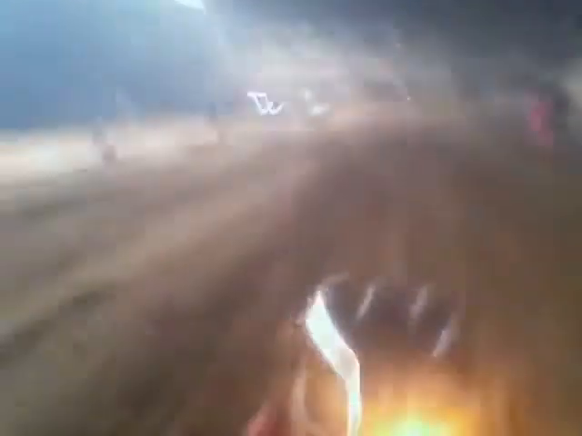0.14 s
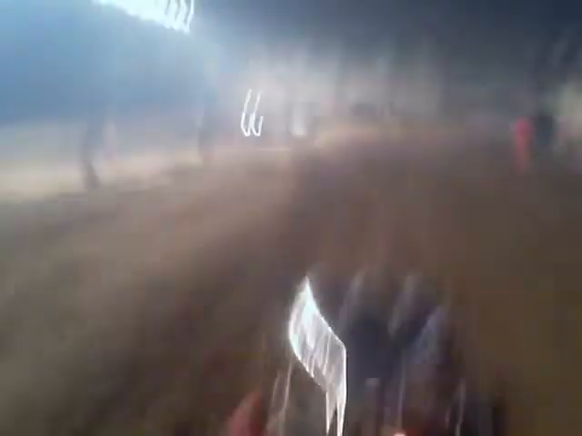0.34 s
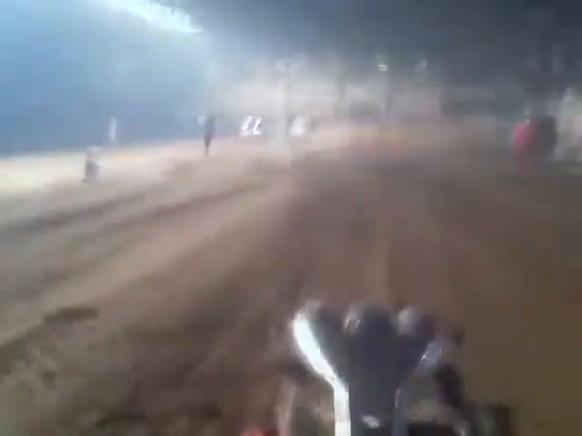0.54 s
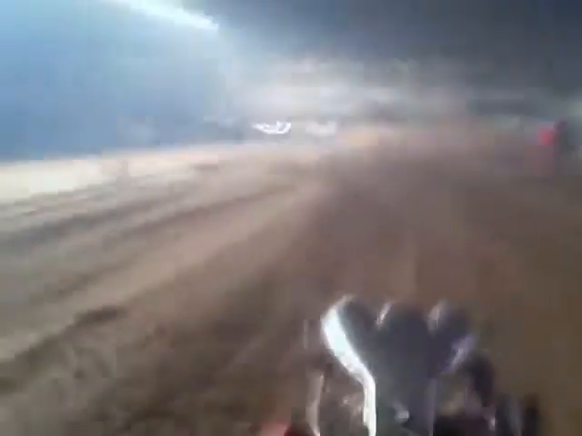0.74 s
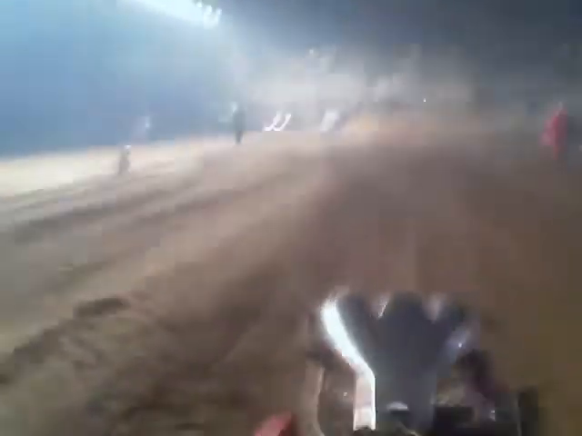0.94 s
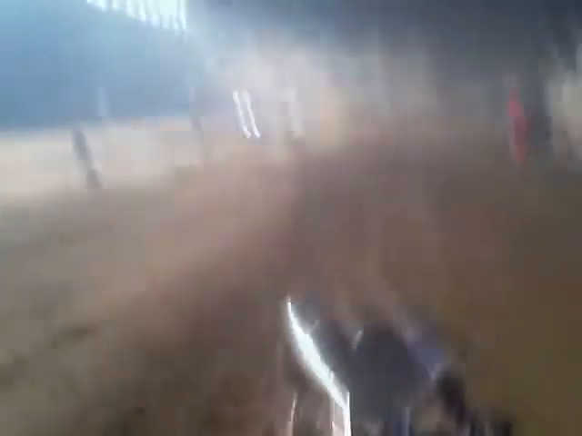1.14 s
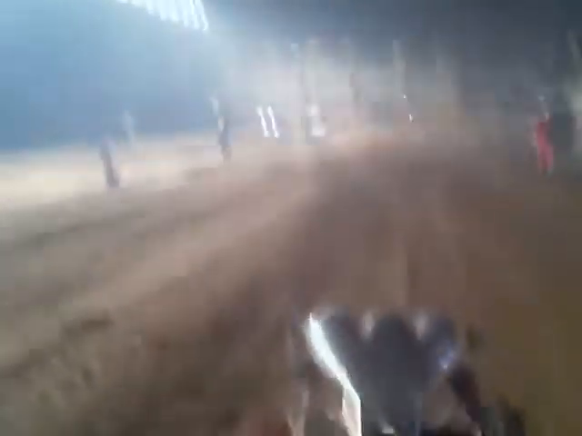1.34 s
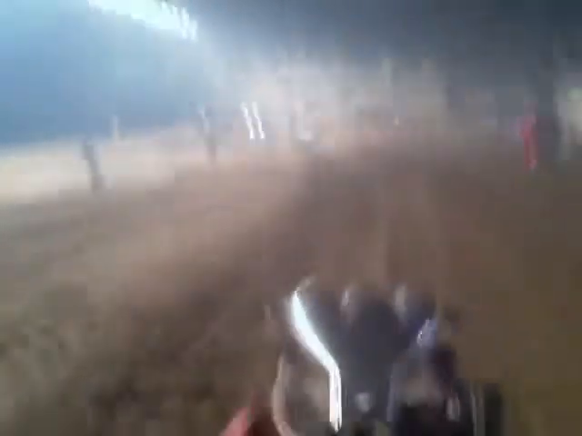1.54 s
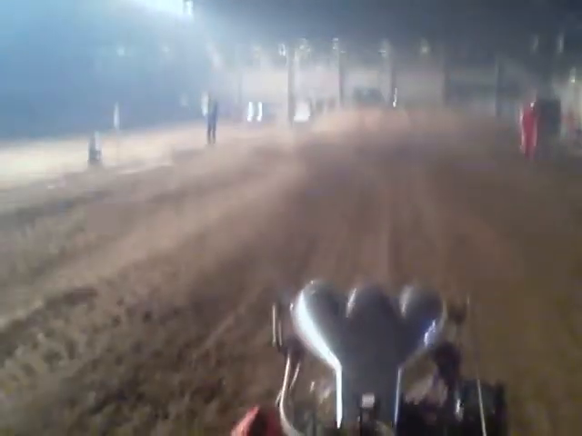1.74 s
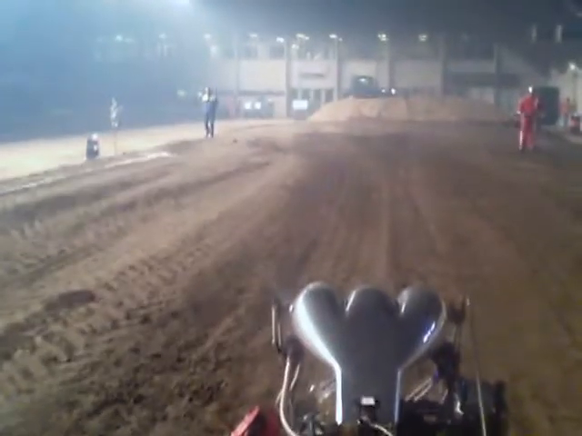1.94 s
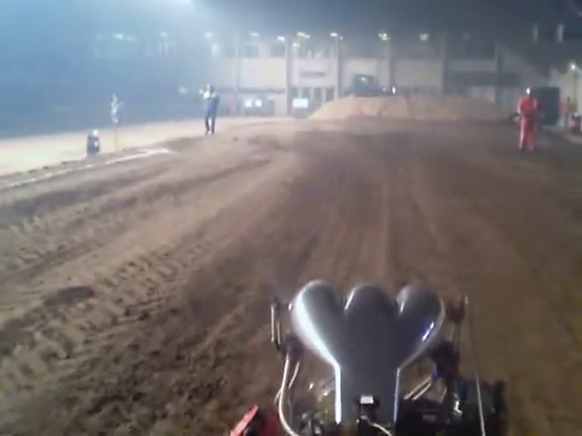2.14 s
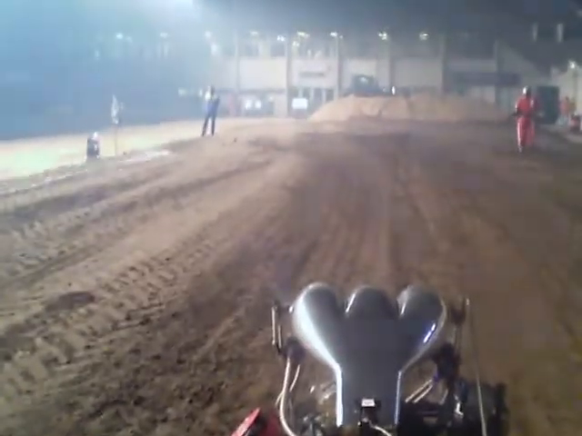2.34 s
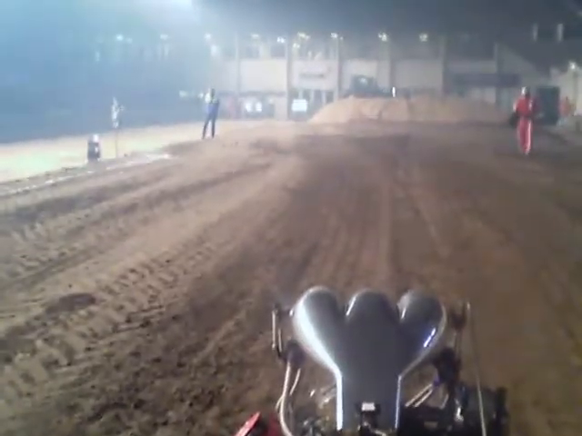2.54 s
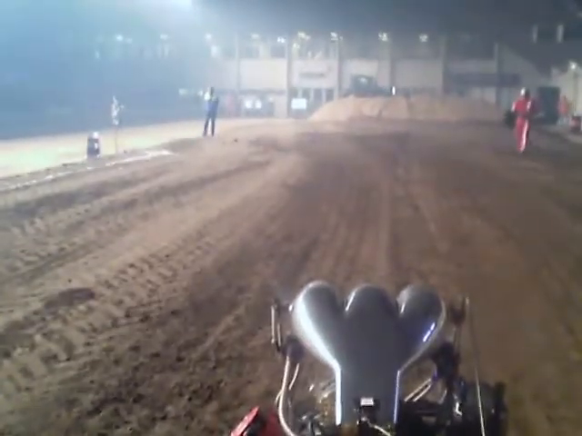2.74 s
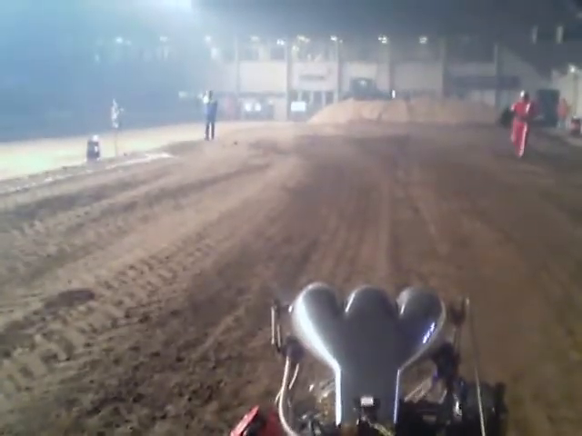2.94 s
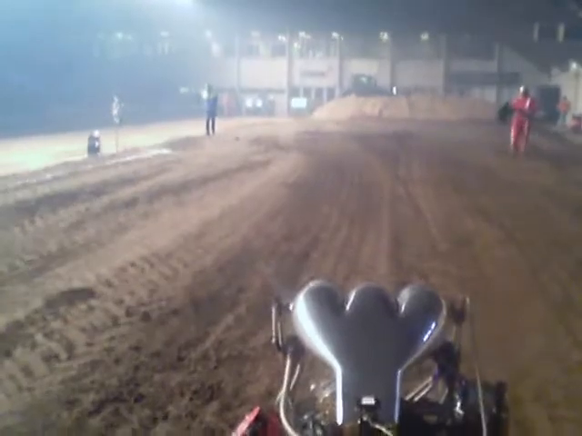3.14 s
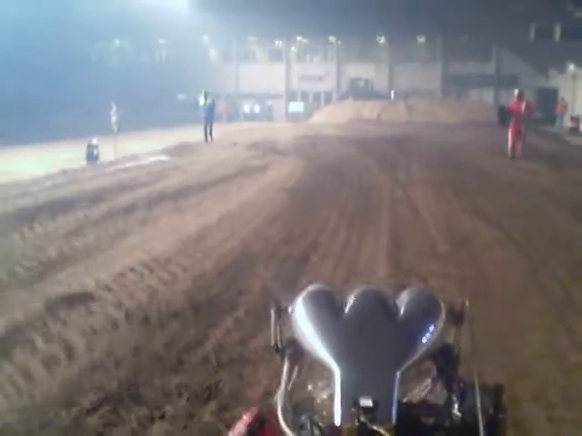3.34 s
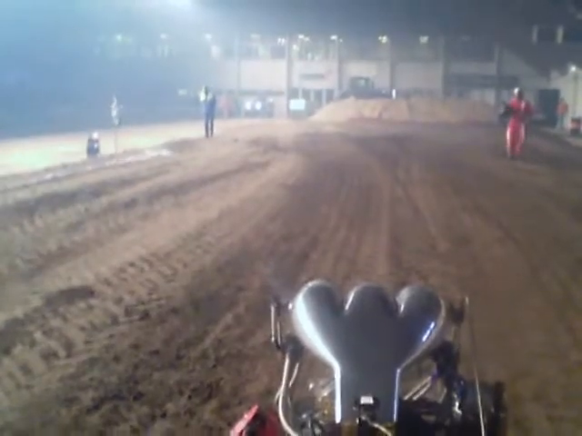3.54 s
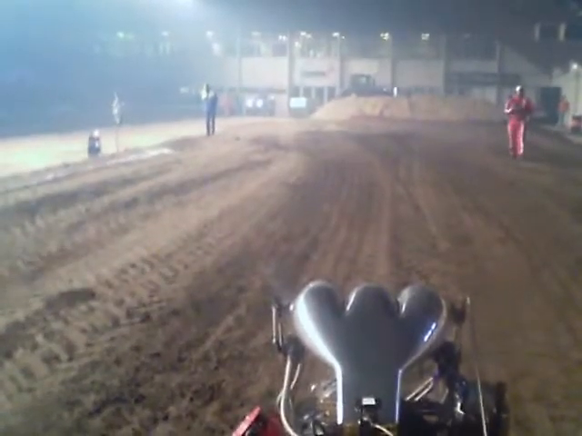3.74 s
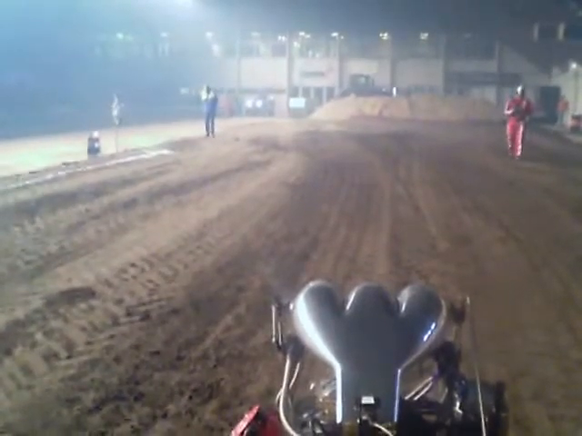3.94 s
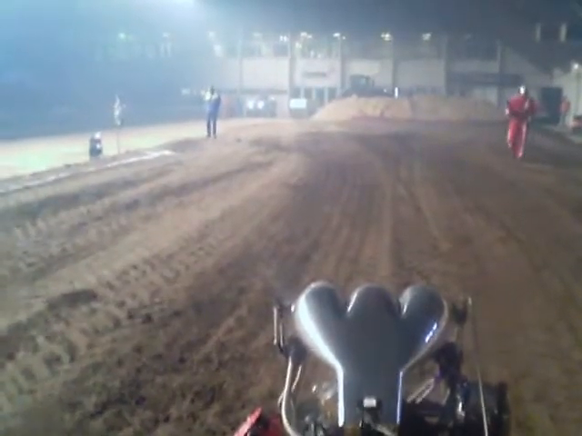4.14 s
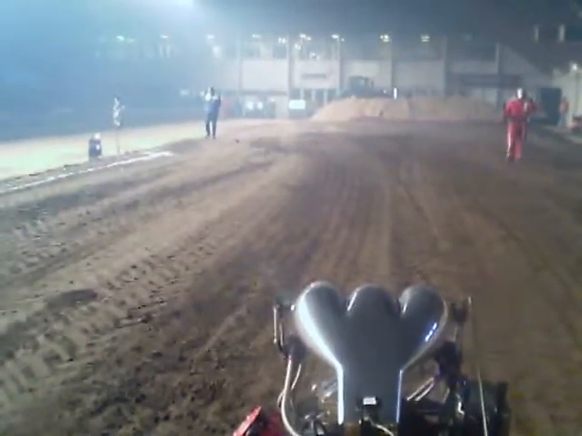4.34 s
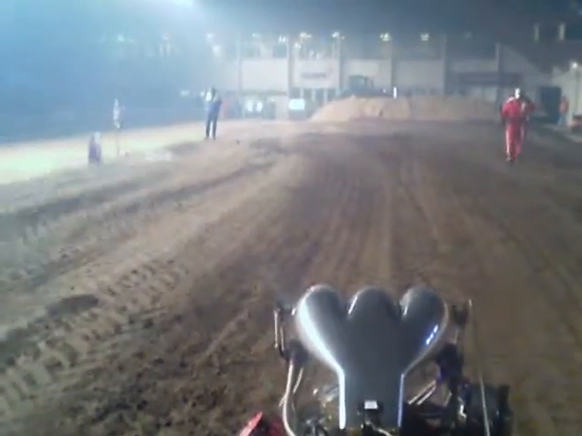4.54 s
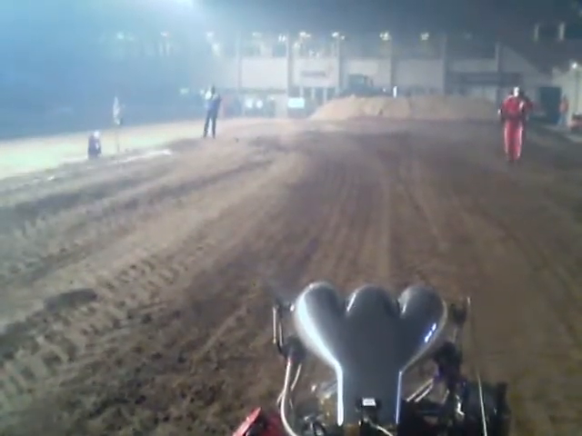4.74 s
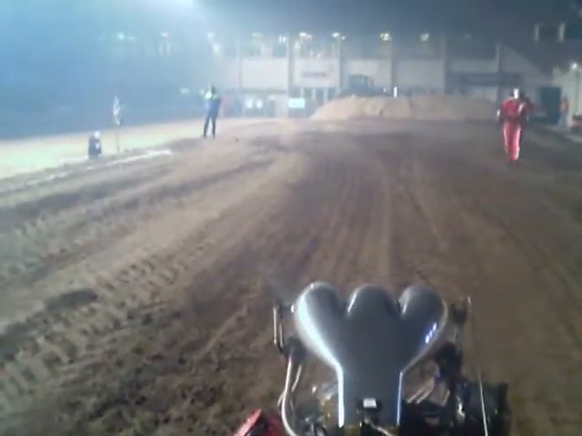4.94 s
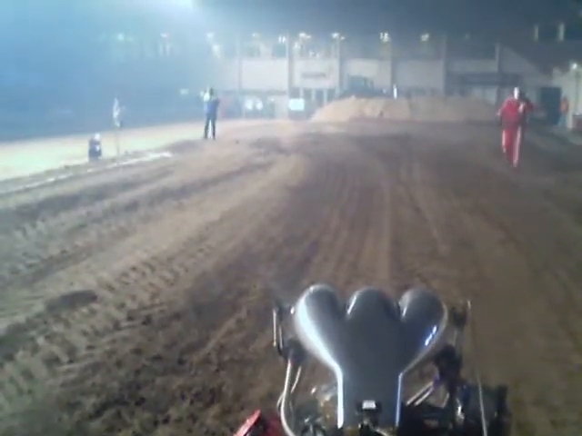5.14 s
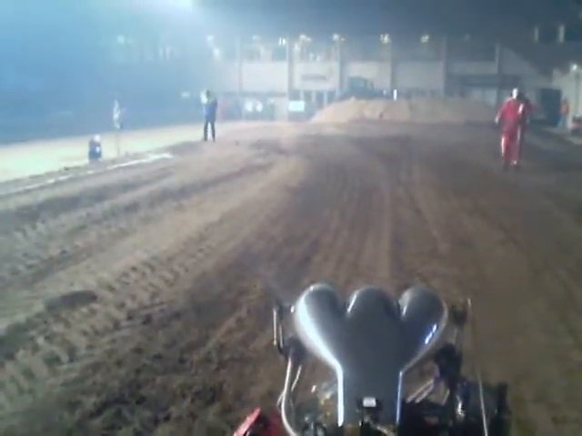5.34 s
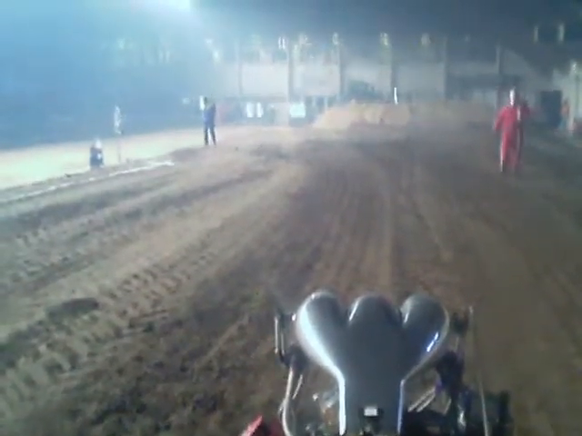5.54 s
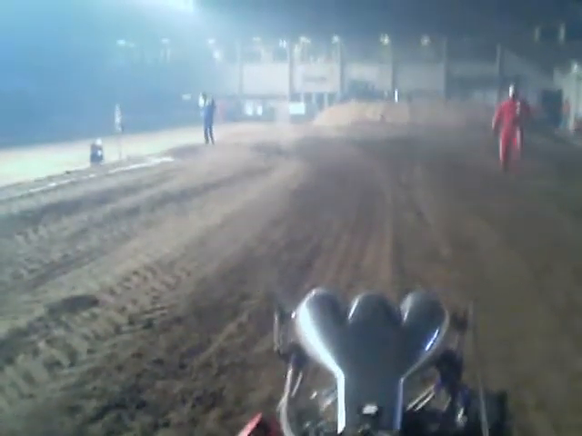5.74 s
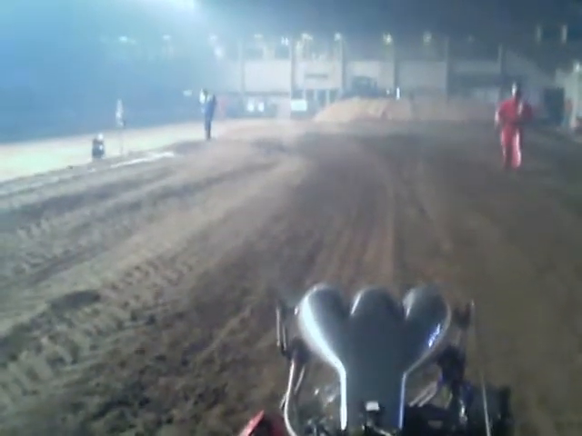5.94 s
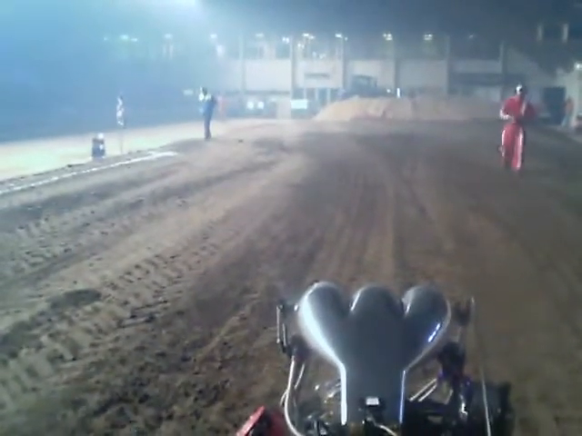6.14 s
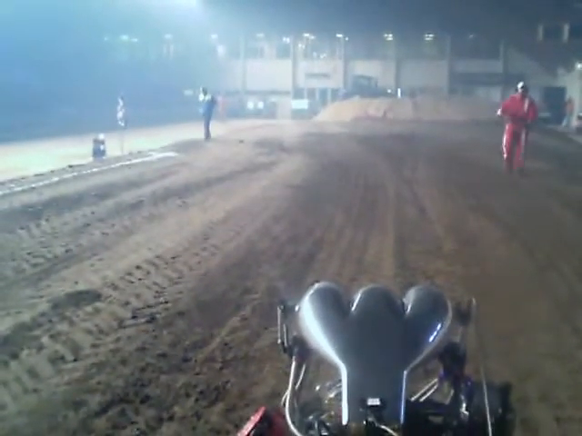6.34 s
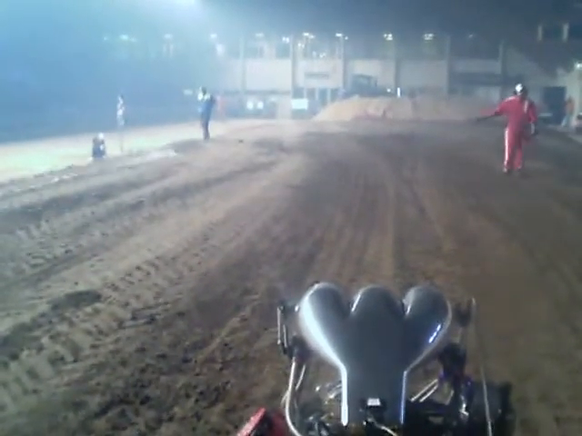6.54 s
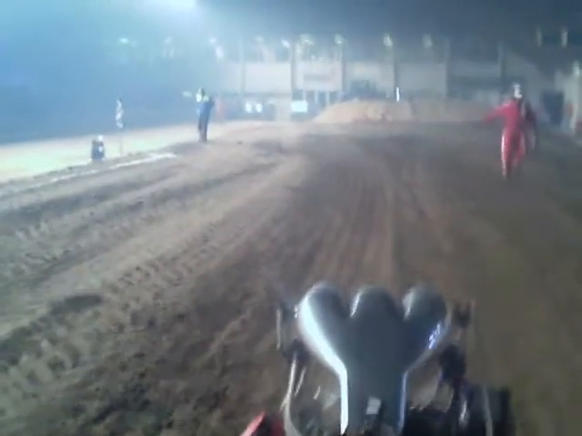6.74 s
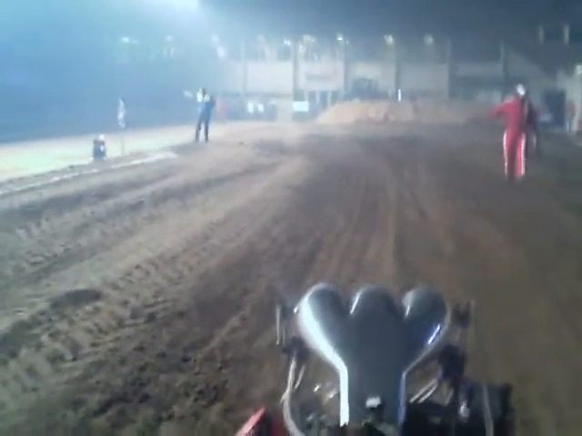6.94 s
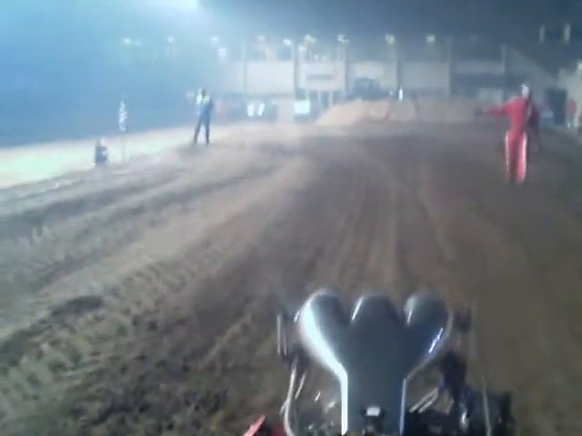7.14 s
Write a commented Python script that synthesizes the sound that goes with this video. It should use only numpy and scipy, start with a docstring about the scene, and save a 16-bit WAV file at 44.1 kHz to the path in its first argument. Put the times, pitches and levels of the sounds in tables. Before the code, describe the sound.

A supercharged pulling tractor roars at full throttle in an indoor arena, with hissing exhaust and whining gears overloading a small microphone mounted on the vehicle. In under a second the throttle snaps shut and the roar dies away in the hall. The chassis gives a few light knocks and rattles as it stops. The engine speed falls, wavers, then settles into a much quieter idle with irregular sharp exhaust cracks.

```python
"""A supercharged pulling tractor runs at full throttle; the throttle snaps shut, and the engine hunts
and settles to an idle. Each firing releases a crack of exhaust gas, which the hall smears into a roar.
Gears whine under load, and the frame rumbles and jolts as the tractor rocks to a stop. All is heard
through a small camera bolted to the frame: its housing rings near 1.1 kHz, and full throttle
overloads its microphone amplifier."""
import sys
import numpy as np
from scipy import signal
from scipy.io import wavfile
from scipy.ndimage import uniform_filter1d

SR = 44100
rng = np.random.default_rng(int(sys.argv[2]) if len(sys.argv) > 2 else 0)


def transcribe(signal):
    """Save signal, clipped to [-1, 1], as a 16-bit WAV file at the path in sys.argv[1]."""
    frames = np.atleast_2d(signal).T
    limited = np.clip(frames, -1, 1)
    pcm = np.round(limited * 32767).astype(np.int16)
    wavfile.write(sys.argv[1], SR, pcm)


N = 321048

# Engine speed: full throttle, the fall, hunting, idle. Each row: time in seconds, firings per second.
FIRING_RATE = [(0.0, 407.4), (0.7, 407.42), (1.03, 187.53), (1.19, 127.84), (1.57, 132.56), (1.78, 77.85),
               (2.0, 73.87), (2.3, 129.18), (2.79, 81.94), (3.25, 111.41), (3.6, 93.15), (3.8, 90.12),
               (4.07, 102.23), (4.99, 98.73), (5.36, 103.19), (5.7, 99.94), (6.34, 102.85), (6.93, 99.76),
               (7.28, 106.04)]
# Loudness under changing load; the crackle swells as the engine gains speed. Each row: time in seconds,
# then nominal levels in dB of exhaust crackle, mount shaking and frame rumble.
ENGINE_LEVELS = [(0, 3.5, -15.5, -18.5), (.35, 4.5, -17.5, -14.5), (.64, 2.5, -11, -16),
                 (.709, -13.5, -17.5, -23), (.72, -37, -36.5, -48), (.81, -36, -39, -41.5),
                 (.87, -38, -45, -50), (.92, -42.5, -49, -56), (1.03, -45, -47, -61),
                 (1.3, -41, -48, -53.5), (1.56, -41.5, -45.5, -58), (1.62, -44, -51.5, -57),
                 (1.77, -56, -63.5, -63), (1.98, -49.5, -62.5, -66), (2.04, -46.5, -55, -64),
                 (2.2, -42.5, -50, -66.5), (2.53, -60.5, -58.5, -71), (3.08, -44.5, -55.5, -68),
                 (3.55, -56, -58, -68.5), (4., -48, -57, -67.5), (4.58, -50, -58, -67),
                 (4.63, -55, -56, -69), (4.67, -49, -59, -67), (5.2, -49.5, -58, -67.5),
                 (6.73, -50, -58.5, -68.5), (6.79, -45.5, -55.5, -74), (6.85, -51.5, -56.5, -68.5),
                 (7.28, -47.5, -57, -65)]
# Imbalance of the cylinders, in firing order. Each entry: relative strength in dB.
CYLINDER_STRENGTHS = [-3.5, -2, 2.5, -0.1, -1, 0.2, 1.2, -2.5]
# The loudest single exhaust cracks. Each row: start in seconds, nominal peak in dB.
LOUD_CRACKS = [(1.1208, -24), (1.1977, -25), (1.3244, -26), (1.3845, -27.5), (1.907, -32.5), (2.0264, -30),
               (2.175, -28), (2.4598, -33), (2.6016, -35.5), (2.6414, -35), (3.0333, -29), (3.1238, -26),
               (3.271, -34), (3.5105, -33), (3.7792, -28), (3.9195, -27), (4.0013, -30), (4.0417, -28.5),
               (4.2597, -28.5), (4.2888, -25), (4.3264, -31), (4.3971, -25.5), (4.4267, -26.5),
               (4.5244, -28), (4.555, -27), (4.734, -31.5), (4.7644, -29.5), (4.796, -24), (5.006, -30.5),
               (5.0484, -28.5), (5.199, -27.5), (5.2868, -35), (5.3155, -29.5), (5.432, -30.5),
               (5.6002, -33.5), (5.67, -27.5), (5.828, -32), (6.0333, -26.5), (6.0766, -29.5),
               (6.126, -29.5), (6.193, -29), (6.222, -30), (6.312, -32.5), (6.4281, -28), (6.4958, -26),
               (6.6239, -31), (6.7855, -32), (6.852, -31), (6.8932, -29), (6.9316, -34), (7.0523, -27),
               (7.0896, -29.5), (7.1768, -27), (7.214, -26)]
# Exhaust hiss. Each row: frequency in Hz, relative spectral density in dB.
EXHAUST_SPECTRUM = [(400, -23.5), (800, -15.5), (1500, -17.5), (2600, -20), (4300, -19), (4800, -10),
                    (5200, -11.5), (6000, -2), (6500, -4.5), (7700, -2), (9000, -5), (10000, -17),
                    (10800, -15.5)]
# Roar thrown back by the hall. Each row: frequency in Hz, relative spectral density in dB.
HALL_SPECTRUM = [(300, -35), (700, -10.5), (1400, -3), (2600, -14.5), (4200, -10), (4900, -11),
                 (6000, -0.5), (7700, -5.5), (9000, -5.5), (10000, -11), (10800, -22)]
# Gear whine under load. Each row: time in seconds, meshing rate in Hz, level in dB before the throb.
GEAR_MESH = [(0, 1105, -11.5), (.12, 1144, -12), (.3, 1092, -12), (.47, 1168, -14), (.65, 1083, -15),
             (.712, 1072, -22)]
# Weaker housing modes. Each row: frequency in Hz, bandwidth in Hz, level in dB against the main mode.
HOUSING_MODES = [(930, 91, -16.5), (1656, 250, -15.5), (2203, 115, -14.5)]
# Tones at once and twice the firing rate. Each entry: level in dB against the rumble, before filtering.
FIRING_HARMONICS = [-3.5, -14.5]
# Frame rumble while rolling. Each row: frequency in Hz, relative spectral density in dB.
ROLLING_SPECTRUM = [(5, 0), (30, -15), (120, 5), (200, -6.5), (350, -1.5), (480, -11), (800, -31),
                    (2000, -43)]
# Frame rumble at rest. Each row: frequency in Hz, relative spectral density in dB.
RESTING_SPECTRUM = [(5, 7), (30, 1), (130, -3), (180, -7.5), (215, 7), (260, -8.5), (400, -9), (800, -34.5),
                    (2000, -41)]
# Jolts of the frame. Each row: time in seconds, push level in dB, push length in ms (negative for
# a pull), rattle level in dB.
FRAME_JOLTS = [(0.792, -40, 2, -29.5), (0.85, -39, -1.5, -44), (1.054, -42, -1.5, -44),
               (1.327, -43.5, -1, -55), (1.548, -39, 3.5, -45), (1.572, -37.5, -1.5, -38),
               (1.653, -42.5, 1.5, -52), (1.687, -41, 3, -51), (1.738, -47, -1, -58), (1.79, -55, 9, -61),
               (1.814, -48, -3, -53), (1.876, -46, -3, -57), (1.936, -46, -2, -62),
               (1.959, -48.5, 1.5, -58), (1.99, -56, -1.5, -56)]
# Loose parts after a jolt. Each row: frequency in Hz, relative spectral density in dB.
RATTLE_SPECTRUM = [(300, -15), (1500, -5), (4000, -2), (6000, -24), (11000, -32)]


def gain_of(db):
    """Amplitude ratio of a level in decibels; doubling the level gives the power ratio."""
    return 10 ** (np.asarray(db) / 20)


def unit_rms(x):
    """Normalisation to a mean power of 1."""
    return x / np.sqrt(np.mean(x ** 2) + 1e-20)


def curve(rows, column):
    """Linear interpolation of one column of a time table at every sample."""
    rows = np.array(rows)
    return np.interp(np.arange(N) / SR, rows[:, 0], rows[:, column])


def drift(samples):
    """A moving average turns white noise into a slow fluctuation of rms 1."""
    return unit_rms(uniform_filter1d(rng.standard_normal(N), size=samples))


def coloured(white, spectrum, size, patchy_db):
    """Spectral shaping: white noise takes on a spectrum that drifts in small patches, at like power."""
    window = dict(nperseg=size, noverlap=3 * size // 4)
    hz, _, bins = signal.stft(white, SR, **window)
    patches = uniform_filter1d(rng.standard_normal(bins.shape), size=5, axis=0)
    patches = unit_rms(uniform_filter1d(patches, size=4, axis=1))
    points_hz, points_db = np.transpose(spectrum)
    db = np.interp(np.log(hz + 1), np.log(points_hz + 1), points_db)
    shape = unit_rms(gain_of(db[:, None] + patchy_db * patches))
    return signal.istft(bins * shape, SR, **window)[1][:N]


def firings():
    """Phase is the integral of rate: the count of firings so far, starting partway through one."""
    return .69 + np.cumsum(curve(FIRING_RATE, column=1)) / SR


def puff(rise_ms, fade_ms):
    """Exponential rise and decay: the power of one burst over 30 ms, peak 1."""
    ms = np.arange(1320) * 1000 / SR
    shape = (1 - np.exp(-ms / rise_ms)) * np.exp(-ms / fade_ms)
    return shape / shape.max()


def gas_pulses(spread_db, cylinder_share, jitter_ms, rise_ms, fade_ms):
    """A pulse train of gas power, mean near 1: one puff a firing, uneven by cylinder and by chance."""
    phase = firings() - .38  # the blast arrives partway through each firing
    onsets = np.flatnonzero(np.diff(np.floor(phase)))
    strength, lateness = rng.standard_normal((len(onsets), 2)).T
    firing_hz = np.gradient(phase)[onsets] * SR
    unevenness = np.clip(56.0 / firing_hz, 0, 1)  # fast firings are more even
    cylinder_db = np.take(CYLINDER_STRENGTHS, phase[onsets + 1].astype(int), mode="wrap")
    db = unevenness * spread_db * np.clip(strength, -3, 1.1) + cylinder_share * cylinder_db
    delays = (lateness * jitter_ms * SR / 1000).astype(int)
    train = np.zeros(N)
    train[np.clip(onsets + delays, 0, N - 1)] = gain_of(2 * db)
    power = signal.oaconvolve(train, puff(rise_ms, fade_ms))[:N].clip(0)
    return power / uniform_filter1d(power + 1e-9, size=8000)


def exhaust():
    """Amplitude modulation: the firings gate the hiss of escaping gas into a crackle."""
    power = gas_pulses(spread_db=8.4, cylinder_share=0.9, jitter_ms=0.48, rise_ms=1.0, fade_ms=2.3)
    power *= gain_of(2 * curve(ENGINE_LEVELS, column=1))
    power *= gain_of(2 * 1.44 * drift(4000))  # the idle lopes
    crest_db = 8.5  # a crack's rms lies this far under its peak
    for start_s, peak_db in LOUD_CRACKS:
        start = round(start_s * SR)
        crack = gain_of(2 * (peak_db - crest_db)) * puff(rise_ms=0.85, fade_ms=1.85)
        power[start - 220:start + 220] *= .12  # the crack takes the place of its firing
        span = power[start:start + len(crack)]
        span += crack[:len(span)]
    crackle = unit_rms(gain_of(4.94 * drift(16).clip(-3, 1.5)))
    hiss = np.sqrt(power) * crackle * rng.standard_normal(N)
    return coloured(hiss, EXHAUST_SPECTRUM, size=256, patchy_db=2.5)


def hall_roar():
    """Reverberation: the walls smear the firings into a roar that lingers after the throttle shuts."""
    shut_s, t60_s, linger_db = 0.71, 0.62, -28.5
    roar = coloured(rng.standard_normal(N), HALL_SPECTRUM, size=256, patchy_db=1.0)
    crackle_db, shaking_db = curve(ENGINE_LEVELS, column=1), curve(ENGINE_LEVELS, column=2)
    steady = gain_of(-6 + shaking_db + 0.72 * (crackle_db - shaking_db))  # mostly follows the crackle
    since_shut_s = np.clip(np.arange(N) / SR - shut_s, 0, None)
    linger = gain_of(linger_db - 60 * since_shut_s / t60_s)
    return np.hypot(steady, linger) * roar


def gear_whine():
    """Loaded gear teeth radiate a tone at their meshing rate until the throttle shuts."""
    loaded = np.arange(N) / SR < GEAR_MESH[-1][0]
    engine_cycles = firings() / len(CYLINDER_STRENGTHS)
    throb = 1.5 + 0.85 * np.cos(2 * np.pi * engine_cycles)  # the load swings once a cycle
    tone = np.sin(2 * np.pi * np.cumsum(curve(GEAR_MESH, column=1)) / SR)
    return loaded * throb * gain_of(curve(GEAR_MESH, column=2)) * tone


def resonate(force, hz, width_hz):
    """Resonance as a low-pass filter shifted to the mode's frequency; the response has rms 1."""
    carrier = np.exp(2j * np.pi * hz * np.arange(1, N + 1) / SR)
    pole = np.exp(-np.pi * width_hz / SR)
    envelope = signal.lfilter([1 - pole], [1, -pole], force / carrier)
    return unit_rms((carrier * envelope).real)


def housing_ring():
    """Forced vibration: shaking passed up the mount excites the modes of the camera housing."""
    main_hz = 1090
    shake = rng.standard_normal(N)
    pulses = gas_pulses(spread_db=1.7, cylinder_share=1.87, jitter_ms=0.15, rise_ms=1.0, fade_ms=1.8)
    shake *= np.sqrt(1.1 + pulses)
    shake *= gain_of(1.1 * drift(1500))  # it comes in spurts
    broad = resonate(shake, main_hz, width_hz=370.0)
    ring = resonate(broad, main_hz, width_hz=110.0)
    ring += sum(gain_of(db) * resonate(shake, hz, width_hz) for hz, width_hz, db in HOUSING_MODES)
    return gain_of(curve(ENGINE_LEVELS, column=2)) * unit_rms(ring)


def frame_rumble():
    """Mass acts as a low-pass filter: the frame passes low firing tones and a rumble, lumpy if rolling."""
    stop_s, stopping_s = 2, 0.37
    phase = 2 * np.pi * firings()
    waver = gain_of(2.13 * drift(3000))
    tones = sum(gain_of(db) * np.cos(order * phase) for order, db in enumerate(FIRING_HARMONICS, 1))
    tones = signal.sosfilt(signal.butter(6, 235, fs=SR, output="sos"), tones)
    lumps = unit_rms(gain_of(3.0 * drift(500).clip(-2, 1.5)))
    rolling = coloured(lumps * rng.standard_normal(N), ROLLING_SPECTRUM, size=512, patchy_db=0.0)
    resting = coloured(rng.standard_normal(N), RESTING_SPECTRUM, size=2048, patchy_db=0.5)
    at_rest = np.clip((np.arange(N) / SR - stop_s) / stopping_s + .5, 0, 1)
    rumble = np.sqrt(1 - at_rest) * rolling + np.sqrt(at_rest) * resting
    return gain_of(curve(ENGINE_LEVELS, column=3)) * (rumble + waver * tones)


def frame_jolts():
    """Impulsive excitation: each jolt pushes the microphone and sets loose parts rattling."""
    thumps, shaking = np.zeros((2, N))
    lead = 441  # samples ahead of the push
    ms = np.arange(-lead, 879) * 1000 / SR
    for time_s, push_db, push_ms, rattle_db in FRAME_JOLTS:
        at = round(time_s * SR)
        progress = ms / abs(push_ms)
        push = np.exp(-(2 * progress) ** 2)
        swing_back = 0.67 * np.exp(-(progress - 1.4) ** 2)
        thumps[at - lead:][:len(ms)] += np.sign(push_ms) * gain_of(push_db) * (push - swing_back)
        shaking[at:at + len(ms)] += gain_of(rattle_db) * puff(rise_ms=0.425, fade_ms=4.7)
    rattle = coloured(shaking * rng.standard_normal(N), RATTLE_SPECTRUM, size=128, patchy_db=6.0)
    return thumps + rattle


def scene():
    """Superposition: engine, hall, gears, housing and frame add at one microphone."""
    return (exhaust() + hall_roar() + gear_whine() + housing_ring() + frame_rumble() + frame_jolts())[None]


def record(dry):
    """Asymmetric saturation in the amplifier, then capacitor coupling and band-limited half-rate sampling."""
    top, bottom, knee, resting_offset = .08, .235, 4.0, -.0061
    limit = np.where(dry > 0, top, bottom)
    clipped = dry / (1 + abs(dry / limit) ** knee) ** (1 / knee)
    # The capacitor charges to the mean of the lopsided wave and swings back when the overload ends.
    time_constant_s = .045
    pole = np.exp(-1 / (time_constant_s * SR))
    initial_charge = pole * clipped[:, :4000].mean(1, keepdims=True)
    charge = signal.lfilter([1 - pole], [1, -pole], clipped, zi=initial_charge)[0]
    anti_alias = signal.firwin(701, 10680, window=("kaiser", 9), fs=SR)
    half_rate = signal.oaconvolve(clipped - charge, anti_alias[None], "same")
    half_rate[:, 1::2] = 0  # mirrors the treble about a quarter of SR
    gentle = signal.firwin(45, 10800, window=("kaiser", 5.5), fs=SR)
    steep = signal.firwin(511, 12317, window=("kaiser", 9), fs=SR)
    anti_image = np.convolve(2 * gentle, steep)
    return signal.oaconvolve(half_rate, anti_image[None], "same") + resting_offset


dry = scene()
out = record(dry)
transcribe(out)
```